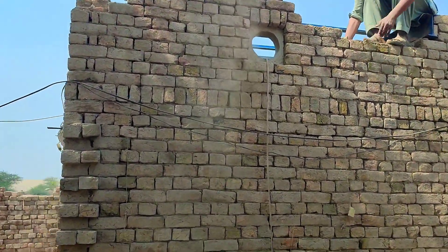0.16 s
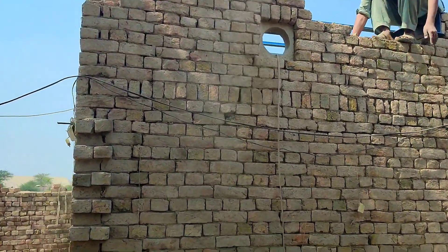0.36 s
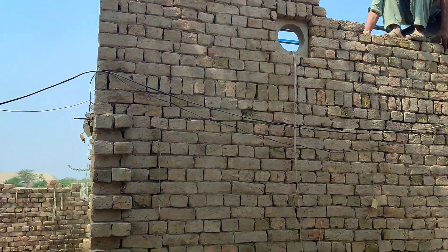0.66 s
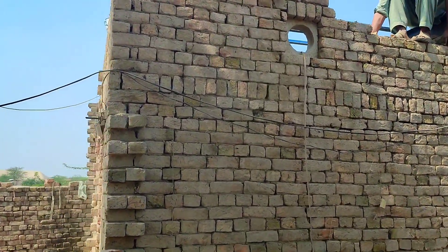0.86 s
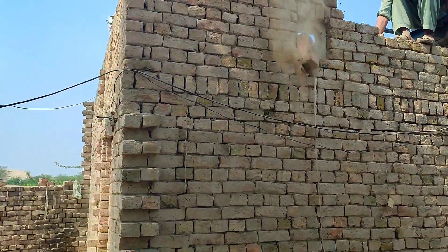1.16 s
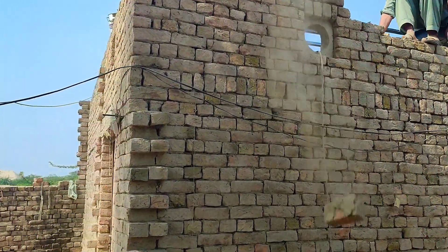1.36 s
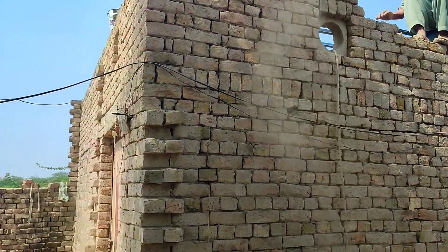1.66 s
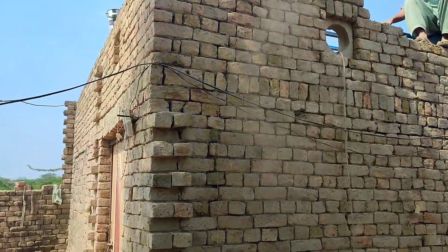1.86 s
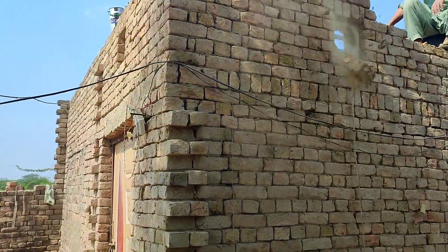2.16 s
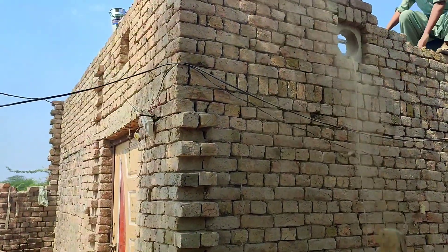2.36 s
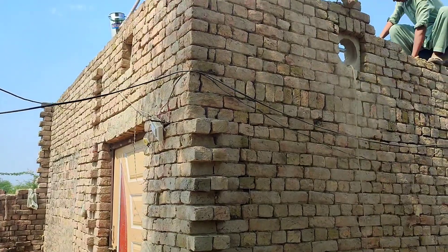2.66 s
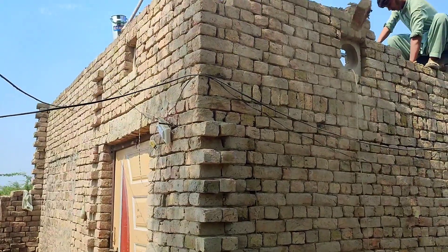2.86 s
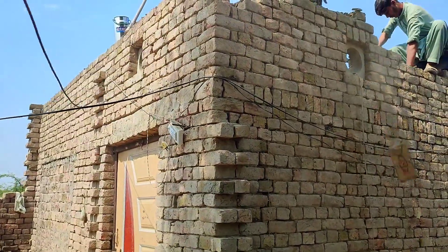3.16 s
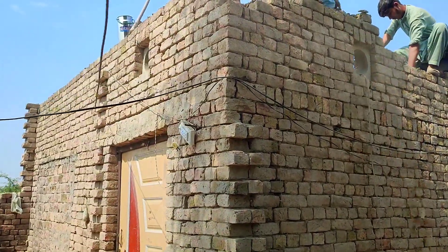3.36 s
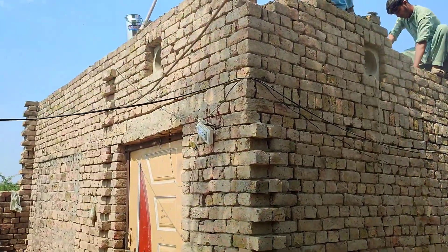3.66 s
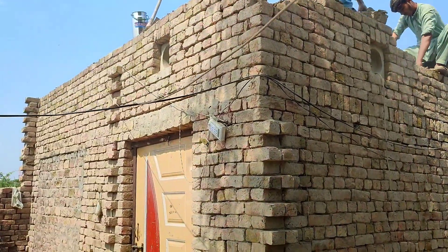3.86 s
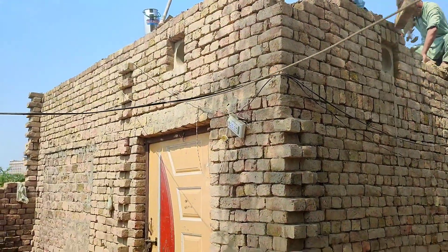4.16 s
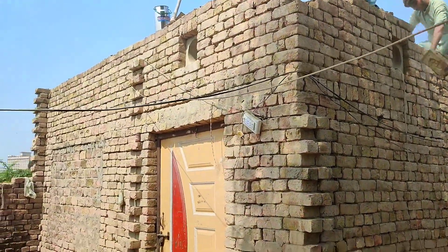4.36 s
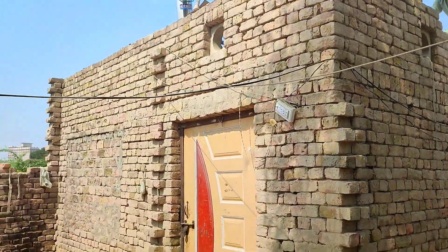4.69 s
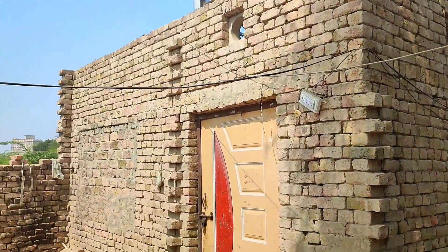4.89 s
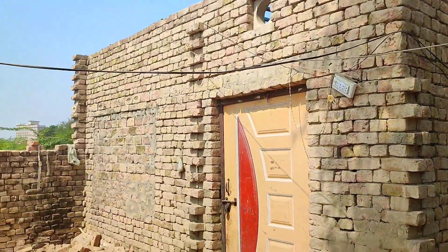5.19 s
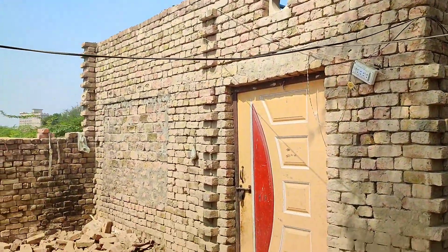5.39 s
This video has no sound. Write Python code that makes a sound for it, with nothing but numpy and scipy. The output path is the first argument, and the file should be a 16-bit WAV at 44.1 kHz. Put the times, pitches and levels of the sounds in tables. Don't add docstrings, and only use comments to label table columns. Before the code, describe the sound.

Loose bricks drop in repeated hollow, cracking crashes onto earth and rubble in an open yard, with crows, small birds and light wind.

```python
import sys
import numpy as np
from scipy import signal
from scipy.fft import rfft, irfft, next_fast_len
from scipy.io import wavfile
from scipy.ndimage import uniform_filter1d, map_coordinates

SR = 44100
rng = np.random.default_rng(int(sys.argv[2]) if len(sys.argv) > 2 else 0)


def waveform_to_disk(signal):
    frames = np.transpose(np.atleast_2d(signal))
    scaled = np.clip(frames, -1, 1) * 32767
    samples = np.round(scaled).astype(np.int16)
    wavfile.write(sys.argv[1], SR, samples)


def ratio_of_db(decibels):
    return 10 ** (np.asarray(decibels, float) / 20)


N = 243873


def unit(x):
    return x / np.sqrt(np.mean(x ** 2) + 1e-20)


def along(points, hz):
    f, v = np.transpose(points)
    return np.interp(np.log(hz + 1), np.log(f + 1), v)


def wobble(rate, size=N):
    knots = rng.standard_normal(int(size * rate / SR) + 4)
    return map_coordinates(knots, [np.arange(size) * rate / SR])


def filtered(x, response):
    m = next_fast_len(x.shape[-1] + 8192)
    spectrum = rfft(x, m) * response(np.fft.rfftfreq(m, 1 / SR))
    return irfft(spectrum, m)[..., :x.shape[-1]]


def resonances(modes):
    def response(f):
        return sum((-1) ** k * ratio_of_db(db) * 1j * f * w / (c * c - f * f + 1j * f * w)
                   for k, (c, w, db) in enumerate(modes))
    return response


def pair(alike, grain_db=0):
    a, b = rng.standard_normal((2, N)) * ratio_of_db(grain_db * wobble(500))
    turn = np.arccos(np.clip(alike, -1, 1)) / 2
    return np.array([np.cos(turn) * a + np.sin(turn) * b, np.cos(turn) * a - np.sin(turn) * b])


def coloured(x, spectrum):
    return unit(filtered(x, lambda hz: ratio_of_db(along(spectrum, hz))))


def patchy(x, depth_db):
    z = signal.stft(x, nperseg=512)[2]
    field = uniform_filter1d(rng.standard_normal(z.shape[1:]), size=7, axis=0)
    field = uniform_filter1d(field, size=10, axis=1)
    return signal.istft(z * ratio_of_db(depth_db * unit(field)), nperseg=512)[1][:, :N]


def swell(s, hold, rise, fall):
    t = np.arange(N) / SR
    return ratio_of_db(-rise * np.clip(s - t, 0, None) - fall * np.clip(t - s - hold, 0, None))


def arch(length, hz, drop, jitter):
    u = np.arange(int(length * SR)) / (length * SR)
    rise = .13 * np.clip(1 - u / .45, 0, 1) ** 2
    fall = drop * np.clip((u - .45) / 0.5, 0, 1) ** 2
    unsteady = 1 + jitter * wobble(111, size=SR // 2)[:len(u)]
    pitch = hz * unsteady * (1 - rise - fall)
    return np.cumsum(pitch) / SR, np.sin(np.pi * u) ** .6


def ring(hz, t60, attack=0.00037, size=12000):
    t = np.arange(size) / SR
    return np.sin(2 * np.pi * hz * t) * ratio_of_db(-60 * t / t60) * (1 - np.exp(-t / attack))


def burst(hz, width_hz, t60, unlike=1.0, attack=0.00085, size=4096):
    t = np.arange(size) / SR
    noise = rng.standard_normal(size) + unlike * rng.standard_normal((2, size))
    band = resonances([(hz, width_hz, 0)])(np.fft.rfftfreq(size, 1 / SR))
    shape = ratio_of_db(-60 * t / t60) * (1 - np.exp(-t / attack))
    puff = irfft(rfft(noise) * band ** 2, size) * shape
    return unit(puff) * np.sqrt(np.mean(shape ** 2)) / 2


LAG_S, TURN = -.00004, .00005


def add(track, s, sound, pan_db=0):
    both = ratio_of_db([[pan_db / 2], [-pan_db / 2]]) * sound
    for side, wave, at in zip(track, both, (s + LAG_S + TURN * s, s)):
        part = side[max(round(at * SR), 0):][:len(wave)]
        part += wave[:len(part)]


# time in seconds, level in dB.
GUSTS = [(0.0, -49.5), (.15, -42), (.26, -41), (.61, -50), (1.08, -51.5), (1.35, -55), (1.6, -47.5),
         (1.72, -41), (2.03, -44), (2.54, -37.5), (3.06, -44), (3.3, -53.5), (3.7, -49), (4.17, -50),
         (4.56, -50), (4.9, -42), (5.34, -50), (5.53, -52)]
# frequency in Hz, density in dB per Hz.
BUFFET = [(12, -32), (20, -1.5), (48, 8.5), (70, 5), (147, -3), (226, -14), (300, -18), (390, -52),
          (660, -120)]
HUM = [(71, -37), (120, -4), (339, -14), (521, -14.5), (770, -17.5), (1320, -21.5), (2290, -35),
       (3000, -52), (3900, -63), (6600, -120)]
HISS = [(1180, -26), (2000, -3.5), (2310, -8.5), (3810, -11), (4880, -13), (5320, -10), (7360, -10.5),
        (8600, -22), (10600, -21), (13700, -17.5), (14800, -34), (15500, -53)]
HUM_DB, HISS_DB, HISS_FOLLOWS = -54, -63, 0.045


def air():
    gust_db = np.interp(np.arange(N) / SR, *np.transpose(GUSTS))
    hiss_db = HISS_DB + HISS_FOLLOWS * (gust_db - gust_db.mean())
    buffet = ratio_of_db(gust_db + 0.55 * wobble(6) + 3.1 * wobble(17)) * coloured(pair(0.37), BUFFET)
    hum = ratio_of_db(HUM_DB + 0.98 * wobble(4.7)) * coloured(patchy(pair(0.53), depth_db=1.5), HUM)
    leaves = patchy(pair(0.096, grain_db=1.5), depth_db=3.6)
    return buffet + hum + ratio_of_db(hiss_db + 0.56 * wobble(7.6)) * coloured(leaves, HISS)


# frequency in Hz, t60 in seconds.
WALLS = [(150, 0.12), (1000, 0.22), (8000, 0.26)]


def yard(x):
    hz, t, z = signal.stft(rng.standard_normal((2, SR // 2)), SR, nperseg=256)
    tail = signal.istft(z * ratio_of_db(-60 * t / along(WALLS, hz)[:, None]), SR, nperseg=256)[1]
    late = np.pad(x, ((0, 0), (300, 0)))
    return signal.fftconvolve(late, tail / np.linalg.norm(tail[0]), axes=1)[:, :N]


# start in seconds, length in seconds, top pitch in Hz, level in dB,
# pitch drop at the end from 0 to 1.
CAWS = [(0.0, 0.12, 474, -52.5, 0.06), (.24, .2, 544, -63, 0), (0.587, .18, 474, -58.5, 0.15),
        (.837, 0.3, 500, -49.5, 0.13), (.859, 0.31, 422, -48.5, 0.05), (2.845, 0.245, 450, -44, 0.15),
        (3.684, .26, 442, -45.5, 0.16), (4.15, 0.23, 455, -51, 0.05), (4.22, 0.26, 520, -52, 0.06),
        (4.96, 0.24, 425, -49, .1), (5.3, .3, 550, -51, 0.2), (5.33, .3, 492, -51, .1),
        (5.19, .1, 560, -55, .05), (5.1, .08, 500, -49, .1)]
# start in seconds, length in seconds, top pitch in Hz, level in dB.
CROAKS = [
    (.581, .22, 475, -59.5),
    (.907, .11, 555, -52.5),
    (1.041, 0.043, 610, -48.5),
    (1.2, 0.33, 415, -66),
    (4.66, 0.097, 584, -58),
    (5.324, .19, 462, -63),
]
OPEN_THROAT, SHUT_THROAT, CROAK_DROP = 3.96, 2.02, 0.031


def crows():
    out = np.zeros((2, N))
    hoarse, jitter = .2, .013
    calls = [(*row, OPEN_THROAT) for row in CAWS] + [(*row, CROAK_DROP, SHUT_THROAT) for row in CROAKS]
    for s, length, hz, db, drop, ratio in calls:
        throat_hz = ratio * hz
        turns, shape = arch(length, hz, drop, jitter)
        pulses = sum(np.cos(2 * np.pi * h * turns) for h in range(1, 14))
        pulses = pulses * (1 + 0.2 * np.cos(np.pi * turns))
        rasp = rng.standard_normal(SR // 2)[:len(turns)] * (1 + np.cos(2 * np.pi * turns))
        throat = resonances([(.5 * throat_hz, 200, -12), (0.732 * throat_hz, 300, -5), (throat_hz, 520, 0),
                             (1.22 * throat_hz, 300, -6), (2.05 * throat_hz, 1100, -12)])
        voiced, rough = (unit(filtered(x, lambda f: throat(f) ** 2)) for x in (pulses, rasp))
        call = np.sqrt(1 - hoarse) * voiced + np.sqrt(hoarse) * rough
        add(out, s, ratio_of_db(db) * shape * call[None], -1)
    return out


# start in seconds, length in seconds, top pitch in Hz, level in dB.
CHIRPS = [
    (1.022, 0.065, 3310, -49.5),
    (1.163, 0.047, 3220, -51),
    (4.606, 0.08, 3266, -47),
]


def sparrows():
    out = np.zeros((2, N))
    partials = [(.5, 0.32), (1, 0.76), (1.11, 0.69), (1.23, 0.61), (1.48, 0.35), (1.75, 0.2), (2, 0.25)]
    for s, length, hz, db in CHIRPS:
        turns, shape = arch(length, hz, drop=.27, jitter=.02)
        chirp = sum(share * np.sin(2 * np.pi * m * turns) for m, share in partials)
        add(out, s, ratio_of_db(db) * shape * chirp[None], -9)
    return out


# seconds after its start, length in seconds, pitch in Hz, level in dB.
PHRASE = [
    (0, 0.0096, 6000, -65),
    (.028, 0.012, 4520, -59),
    (0.049, 0.025, 7100, -53),
    (0.082, .012, 4020, -67),
    (.102, .015, 5950, -59),
    (0.127, 0.014, 5070, -59),
]
# start in seconds, level in dB.
PHRASE_STARTS = [
    (2.477, -5),
    (3.2, 0),
    (3.695, -2),
    (3.94, -3),
    (4.185, -3),
    (4.428, 1),
]


def warbler():
    out = np.zeros((2, N))
    for start, near_db in PHRASE_STARTS:
        for s, length, hz, db in PHRASE:
            t = np.arange(int(length * SR)) / SR
            warble = 2 * np.pi * hz * t + 1.6 * (hz / 7000) ** 2 * np.sin(2 * np.pi * 180 * t)
            note = np.sin(np.pi * t / length) * np.sin(warble)
            add(out, start + s, ratio_of_db(db + near_db + 4) * note[None], -4)
    return out


# start in seconds, number of notes, level in dB.
TRILLS = [
    (4.385, 4, -61),
    (4.11, 3, -64),
    (5.439, 3, -56),
]


def triller():
    out = np.zeros((2, N))
    t = np.arange(int(0.022 * SR)) / SR
    note = np.sin(np.pi * t / t[-1]) * np.sin(2 * np.pi * (3900 * t - 11000 * t ** 2))
    for start, count, db in TRILLS:
        for k in range(int(count)):
            add(out, start + 0.032 * k, ratio_of_db(db) * note[None], -3)
    return out


# frequency in Hz, level in dB, t60 in seconds.
PIPE_MODES = [(563.6, 2, 0.58), (1090, 1, 0.13), (2256, -8.5, 0.12)]


def pipe():
    out = np.zeros((2, N))
    tap = sum(ratio_of_db(db) * ring(hz, t60, attack=0.00091, size=SR // 2) for hz, db, t60 in PIPE_MODES)
    add(out, 3.092, ratio_of_db(-39.5) * tap[None], -1)
    return out


# start in seconds, hold in seconds, level in dB.
DUST = [(0.0, .35, -52.5), (.85, .37, -55.5), (1.7, .15, -56), (2.0, .55, -59), (2.68, .37, -57),
        (3.62, .3, -58), (4.05, .22, -58), (4.63, .06, -57), (4.8, .15, -52), (5.1, .2, -57),
        (5.47, .06, -56)]
DUST_RISE, DUST_FALL = 130, 55


def dust():
    hiss = coloured(pair(0.078, grain_db=2.0), HISS)
    return hiss * sum(ratio_of_db(db) * swell(s, hold, DUST_RISE, DUST_FALL) for s, hold, db in DUST)


# frequency in Hz, density in dB per Hz.
GRIT = [(1060, -43), (1800, -4), (2530, -8.5), (2800, -8), (3290, -16), (7340, -8.5), (9030, -33),
        (12700, -14), (14400, -52), (15500, -109)]
# start in seconds, hold in seconds, level in dB, left over right in dB.
SHOWERS = [
    (0.11, .08, -40, -3),
    (1.18, 0.014, -51, -15.5),
    (1.595, .04, -40, -18),
    (2.597, 0.05, -40, -4),
    (3.493, 0.028, -42.5, -6),
    (4.79, .08, -44, -7),
    (5.032, 0.038, -48, -12.5),
]
SAND_RISE, SAND_FALL = 800, 190


def sand():
    grit = coloured(pair(0.1983, grain_db=3), GRIT)
    out = np.zeros((2, N))
    for s, hold, db, pan in SHOWERS:
        out += ratio_of_db(db + np.array([[pan / 2], [-pan / 2]])) * swell(s, hold, SAND_RISE, SAND_FALL) * grit
    return out


# frequency in Hz, density in dB per Hz.
LUMPS = [(160, -33.5), (280, -2), (318, 0.5), (739, -10), (796, -0.5), (1390, -20.5), (2500, -17),
         (3250, -42), (5500, -120)]
# start in seconds, hold in seconds, level in dB.
TUMBLES = [
    (0.203, 0.12, -46.5),
    (1.565, .01, -55),
    (1.785, 0.03, -44),
    (1.66, .05, -40),
    (4.86, .06, -41),
    (2.583, 0.087, -43),
    (3.51, .05, -42.5),
    (4.78, 0.05, -46),
]
TUMBLE_RISE, TUMBLE_FALL = 430, 174


def tumbling():
    lumps = coloured(pair(0.94, grain_db=5.5), LUMPS)
    return lumps * sum(ratio_of_db(db) * swell(s, hold, TUMBLE_RISE, TUMBLE_FALL) for s, hold, db in TUMBLES)


# start in seconds, peak in dB, pitch in Hz, left over right in dB.
CHIPS = [(.0154, -33.5, 1880, -8), (.1745, -21, 1900, -12), (.2484, -13.5, 6700, -7),
         (.5663, -25, 2200, -4), (.6283, -35, 5000, -2), (.6694, -32, 6000, -5), (1.1727, -32, 6520, -10),
         (1.2082, -28.5, 2040, -10), (1.5514, -34, 5800, -7.5), (1.6057, -5.5, 5800, 1),
         (1.6244, -10.5, 2360, 3), (1.9505, -51, 2520, -10), (2.5604, -38, 6800, -9),
         (3.1906, -40, 5420, -6.5), (3.445, -42, 6700, -24), (3.5333, -16, 4200, -10),
         (3.9713, -44, 7100, -28), (4.0183, -23.5, 2370, -11), (4.0502, -22.5, 1990, -9.5),
         (4.1737, -42, 5920, -9), (4.7648, -26.5, 6760, -9), (4.8005, -22.5, 2390, 12),
         (4.8786, -27.5, 3450, -22.5), (5.0305, -19, 3120, -1), (5.0659, -29.5, 3370, -10),
         (5.2091, -33, 2300, -4), (5.2604, -30, 6400, -10), (5.2939, -42, 2010, -18),
         (5.493, -40, 5000, -18), (5.243, -38, 3500, -5), (5.004, -38, 3200, -5), (3.97, -36, 1600, -3),
         (.118, -16, 2400, 0), (.124, -20, 2900, 0), (2.53, -44, 5000, -5)]
CHIP_T60 = 0.026


def chips():
    out = np.zeros((2, N))
    for s, db, hz, pan in CHIPS:
        tick = burst(hz, .5 * hz, CHIP_T60)
        snap = burst(hz=6000, width_hz=6200, t60=0.54 * CHIP_T60, unlike=1.7)
        add(out, s, ratio_of_db(db) * (tick + 0.88 * snap), pan)
    return out


# start in seconds, peak in dB, pitch in Hz, t60 in seconds.
THUDS = [
    (0.112, -16.5, 100, 0.12),
    (0.248, -27.5, 72.7, 0.18),
    (0.569, -39.5, 136, 0.2),
    (1.617, -21.5, 70.0, 0.21),
    (1.649, -17, 109, 0.14),
    (2.588, -21, 90, 0.27),
    (3.489, -14, 194, 0.19),
    (4.84, -12, 150, 0.16),
    (5.189, -34, 175, 0.32),
]


def thuds():
    out = np.zeros((2, N))
    for s, db, hz, t60 in THUDS:
        add(out, s, ratio_of_db(db) * ring(hz, 0.41 * t60, attack=0.0025)[None])
        rumble = burst(hz=89, width_hz=220, t60=2.04 * t60, unlike=0.18, attack=0.0023, size=16384)
        add(out, s, ratio_of_db(db - 2.5) * rumble)
    return out


# start in seconds, peak in dB, pitch in Hz, t60 in seconds.
RINGS = [
    (.130, -17, 2600, 0.07),
    (.15, -32, 2480, .22),
    (.567, -41, 2340, 0.16),
    (.57, -50, 2500, 0.28),
    (2.252, -41, 2680, 0.08),
    (2.602, -30, 2560, 0.1),
    (3.496, -27, 2950, 0.08),
    (4.844, -30, 2675, 0.07),
    (4.843, -28, 5800, .09),
]


def cracked_bricks():
    out = np.zeros((2, N))
    for s, db, hz, t60 in RINGS:
        add(out, s, ratio_of_db(db) * ring(hz, t60)[None])
        add(out, s, ratio_of_db(db + 3.5) * burst(hz, width_hz=224, t60=1.39 * t60, unlike=0.37, size=16384))
    return out


# start in seconds, peak in dB, pitch in Hz, t60 in seconds.
SINGS = [(.1295, -4.5, 2649, .06), (.1295, -14, 2422, .075), (.1295, -9, 5200, .012),
         (.147, -20, 2700, .04), (.13, -24, 3397, .07), (.13, -22, 716, .09), (.13, -26, 5173, .07),
         (.13, -28, 5609, .08), (.113, -22, 1500, .05), (.118, -22, 2300, .05), (2.603, -22, 1992, .05),
         (2.6015, -9, 452, .038), (2.602, -12, 770, .05), (1.652, -16, 1136, .07), (1.7765, -22, 484, .06),
         (2.2525, -21, 436, .045), (2.2525, -22, 1060, .03), (4.843, -16, 2654, .035),
         (4.843, -24, 3601, .07), (4.878, -26, 3601, .06), (4.843, -20, 950, .04), (.566, -36, 240, .06),
         (.275, -30, 230, .06), (2.837, -22, 1450, .04), (3.4895, -3, 560, .035), (3.495, -10, 1303, .045),
         (3.5, -20, 484, .08), (3.49, -16, 280, .06), (3.495, -22, 991, .07), (3.495, -26, 1696, .08),
         (3.495, -22, 2153, .055), (3.495, -24, 2848, .11), (3.534, -25, 2853, .16),
         (3.534, -34, 2670, .14), (3.534, -38, 3714, .3), (3.534, -36, 1965, .15), (3.534, -38, 5636, .15)]


def whole_bricks():
    out = np.zeros((2, N))
    for s, db, hz, t60 in SINGS:
        add(out, s, ratio_of_db(db) * ring(hz, t60, attack=.0006)[None])
    return out


# start in seconds, peak in dB, pitch in Hz, crack over knock in dB.
FACES = [(.128, -6, 1195, 2), (.1295, -6, 620, -17), (.134, -8, 560, -17), (.1478, -10, 620, -14),
         (.198, -29, 607, -6), (.219, -42, 627, 8), (.293, -42, 442, 8), (1.582, -31, 830, -19.5),
         (1.62, -7, 470, -7), (1.624, -8, 649, -15), (1.644, -27, 900, -9), (1.651, -1.5, 763, -21),
         (1.668, -27, 510, -2), (1.817, -37, 585, 3), (2.601, -10, 483, -12), (2.603, -11, 770, -20),
         (2.624, -27, 480, 5.5), (2.669, -31, 417, -19), (2.705, -26.5, 507, -9), (2.909, -36, 1250, -6),
         (3.489, -6, 537, -12), (4.5, -39, 540, -28), (4.832, -21, 504, -15.5), (4.943, -39, 725, -11),
         (4.988, -35, 504, -14), (5.186, -28, 496, -8)]
# start in seconds, peak in dB, pitch in Hz, crack over knock in dB.
EDGES = [(.106, -16, 823, -8), (.112, -13, 900, -1), (.116, -12, 700, -4), (.123, -18, 600, -4),
         (.445, -38.5, 647, -7), (1.173, -40, 797, -2), (1.592, -26, 407, -4), (1.606, -10.5, 510, -2),
         (1.969, -47, 580, 3), (2.59, -14, 1147, 1.5), (3.494, -2, 640, -4), (3.502, -14, 510, -17),
         (3.626, -42.5, 950, -4), (4.843, -6, 1250, -2.5), (4.878, -29.5, 540, 11)]
# start in seconds, peak in dB, pitch in Hz,
# crack over knock in dB, clack over knock in dB.
CLODS = [
    (.422, -31, 680, -12, -4),
    (.566, -33, 930, -6, 0),
    (1.776, -7, 760, -23, -9),
    (2.2515, -15, 620, -25, 2),
    (2.508, -27, 450, -20, 6),
    (2.824, -23, 400, -34, -2),
    (2.836, -20, 1250, -32, 5),
    (4.727, -21, 520, -12, 5),
    (4.762, -27, 990, -7, -3),
    (4.801, -34, 428, -5, 0),
]
FACE_CLACK_DB, EDGE_CLACK_DB = -8.5, 1
HARD_T60, LONGER_PER_DB, CLOD_T60 = .019, .0003, .017
SOFT_HZ = 1700


def knocks():
    cracks, bodies = np.zeros((2, 2, N))
    heap = [(*row, FACE_CLACK_DB) for row in FACES] + [(*row, EDGE_CLACK_DB) for row in EDGES]
    blows = [(*row, HARD_T60 - LONGER_PER_DB * row[1]) for row in heap]
    blows += [(*row, CLOD_T60) for row in CLODS]
    for s, db, hz, crack_db, clack_db, t60 in blows:
        spread = rng.normal(0, 0.061, size=2)
        body = ring(hz, t60, 0.0022)
        body -= 0.19 * ring(1.466 * hz * (1 + spread[0]), 1.04 * t60)
        body += 0.45 * ring(0.697 * hz * (1 + spread[1]), t60, 0.0012)
        hollow = burst(1.087 * hz, 0.92 * hz, 1.39 * t60, unlike=0.2, attack=0.0019)
        clack = burst(hz=1200, width_hz=500, t60=t60, unlike=.8, attack=0.0014)
        crack = burst(hz=4700, width_hz=8200, t60=0.059, unlike=2.0)
        add(bodies, s, ratio_of_db(db + 3.5) * body[None], -.5)
        add(bodies, s, ratio_of_db(db - 3.5) * hollow)
        add(bodies, s, ratio_of_db(db + clack_db) * clack, 2.5)
        add(cracks, s, ratio_of_db(db + crack_db) * crack, -3)
    return cracks + filtered(bodies, lambda f: (1 - (f / SOFT_HZ) ** 2 + 1.2j * f / SOFT_HZ) ** -2)


def scene():
    near = knocks() + chips() + cracked_bricks() + whole_bricks() + thuds() + pipe()
    far = crows()
    twitter = sparrows() + warbler() + triller()
    rubble = tumbling() + sand() + dust()
    echoes = yard(ratio_of_db(-11.5) * near + ratio_of_db(-9) * twitter) + ratio_of_db(-2) * yard(far)
    return near + far + twitter + rubble + echoes + air()


def low_pass(x):
    return signal.sosfilt(signal.butter(12, 15680, fs=SR, output="sos"), x)


# frequency in Hz, gain in dB.
MIC = [(20, 2), (12000, 0.5), (14200, -3), (15000, -19), (17000, -39)]


def record(dry):
    heard = filtered(dry, lambda hz: ratio_of_db(along(MIC, hz)))
    flattened = heard / (1 + np.abs(heard) ** 8) ** (1 / 8)
    return low_pass(flattened)


dry = scene()
out = record(dry)
waveform_to_disk(out)
```